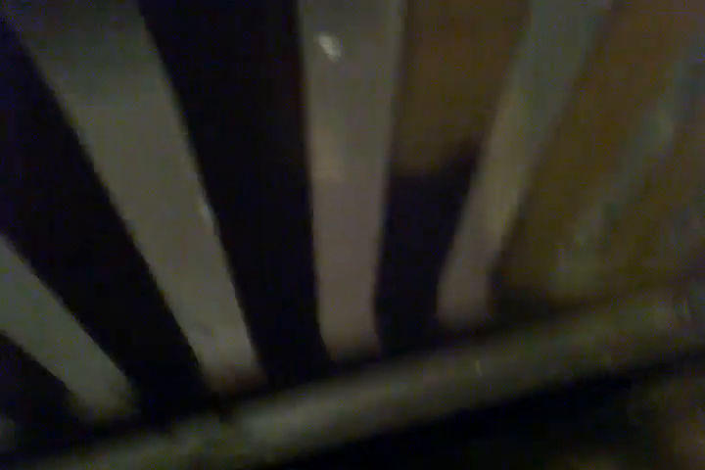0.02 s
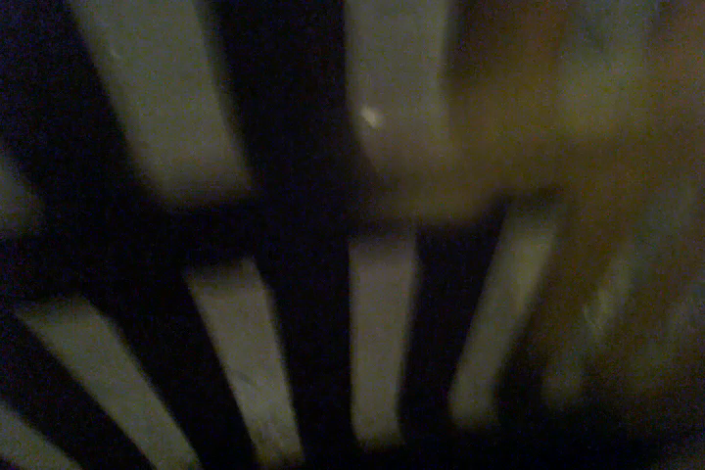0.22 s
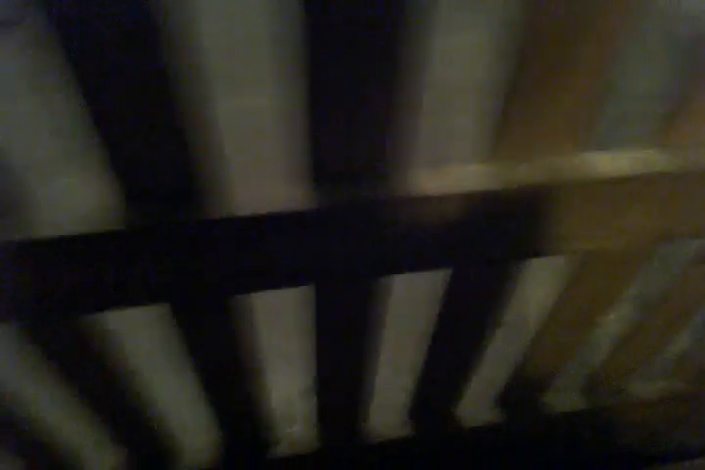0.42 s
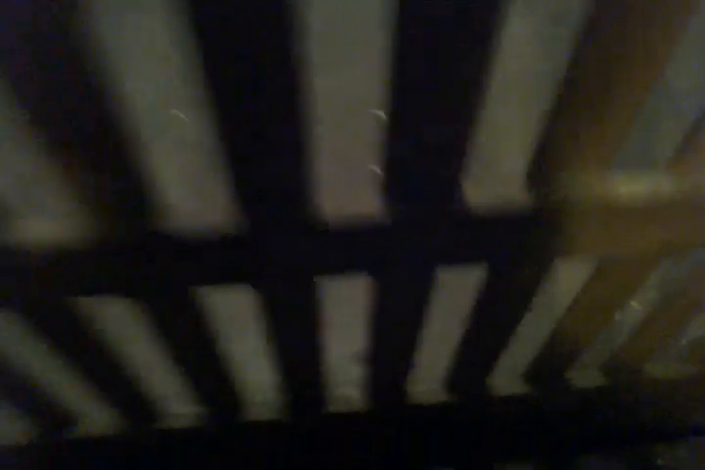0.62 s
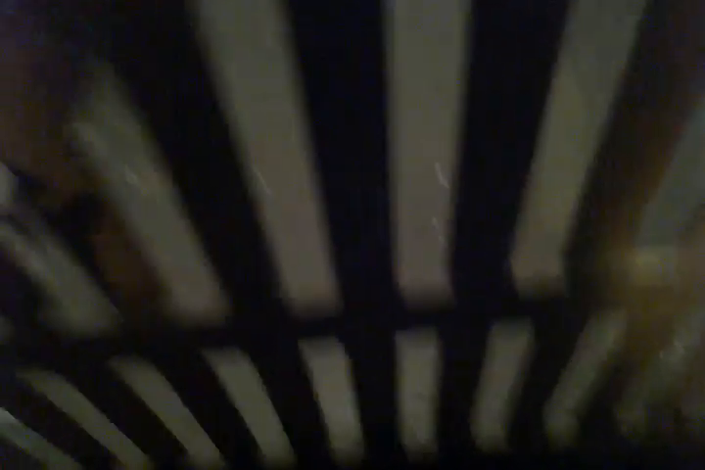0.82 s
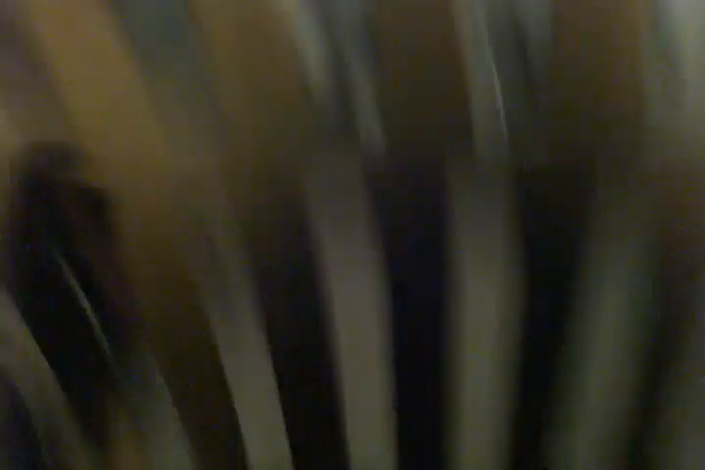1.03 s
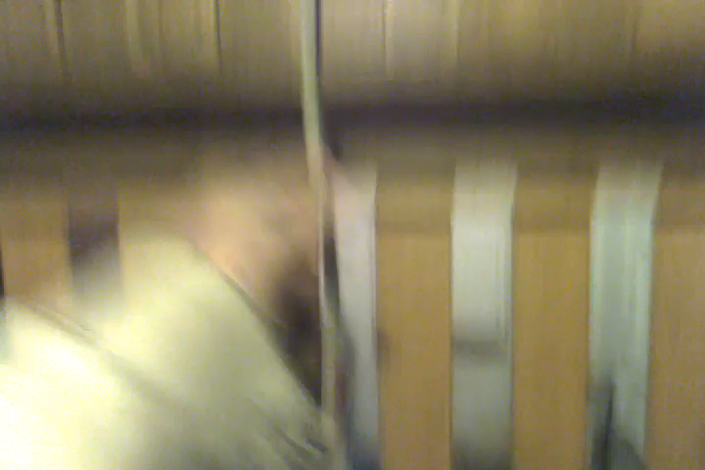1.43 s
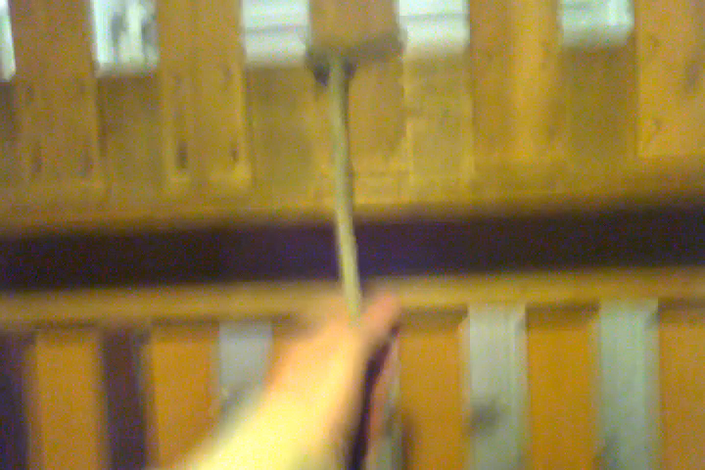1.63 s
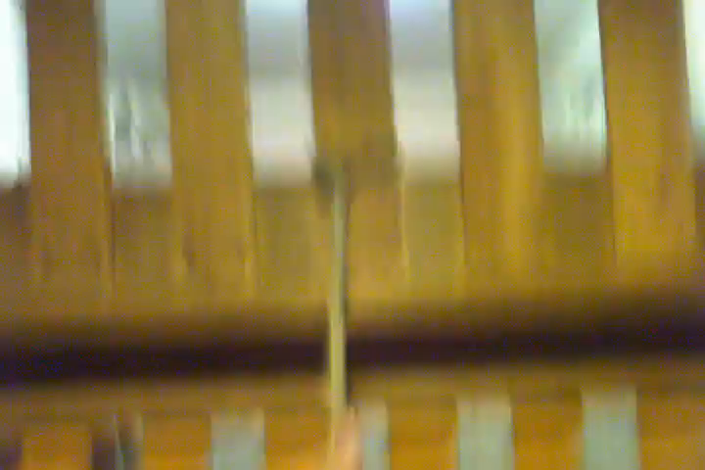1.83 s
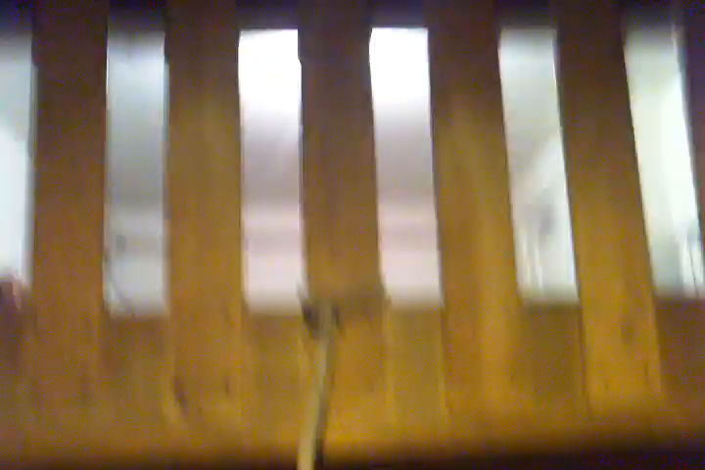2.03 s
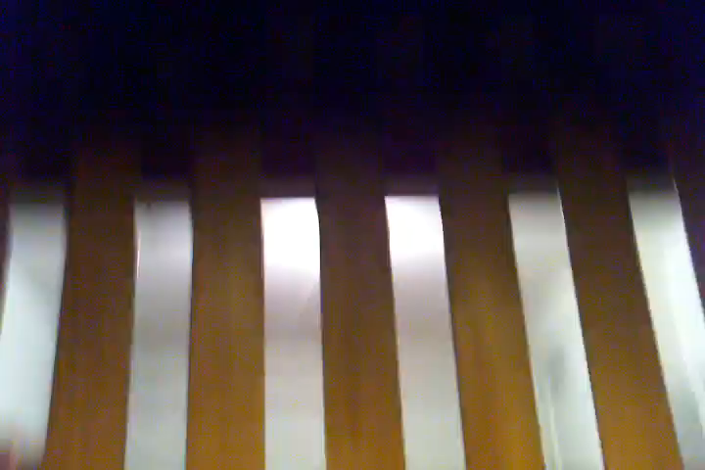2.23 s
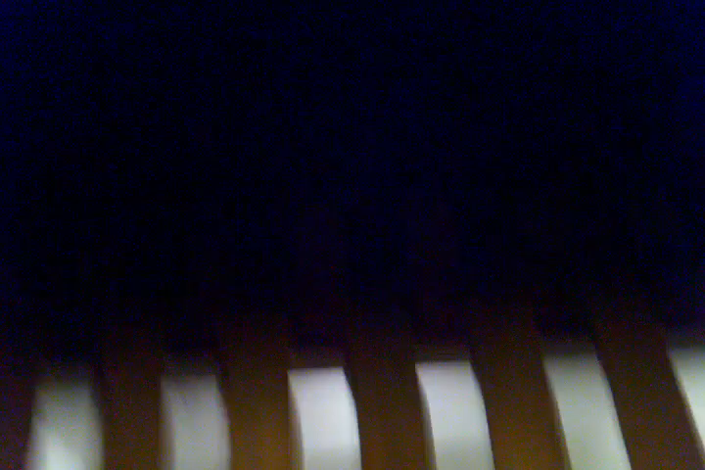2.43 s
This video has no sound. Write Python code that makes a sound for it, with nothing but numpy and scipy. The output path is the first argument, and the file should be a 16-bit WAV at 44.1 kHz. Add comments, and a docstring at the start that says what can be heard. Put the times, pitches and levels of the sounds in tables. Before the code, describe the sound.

Slatted wooden gate clacks loose and rumbles open, fading into faint ticks and microphone bumps.

```python
"""A slatted wooden freight-elevator gate is hauled open. It groans and clacks loose, bangs at 0.3 s, then
rattles ever more softly along its guides while the shaft rings behind it and a sleeve swishes close by.
From 1 s on, fingers bump the hand-held camera, and a few last wooden ticks sound over the building's
drone. Throughout, the two channels are opposite in polarity and a fraction of a millisecond apart."""
import sys
import numpy as np
from scipy import signal
from scipy.fft import rfft, irfft
from scipy.io import wavfile
from scipy.ndimage import uniform_filter1d

SR = 44100
rng = np.random.default_rng(int(sys.argv[2]) if len(sys.argv) > 2 else 0)


def unload_wav(signal):
    """Save mono or channel-first audio to the path in sys.argv[1] as 16-bit WAV at rate SR, clipped to [-1, 1]."""
    wavfile.write(
        sys.argv[1],
        SR,
        np.round(np.clip(np.atleast_2d(signal).T, -1, 1) * 32767).astype(np.int16),
    )


N = 110250
BASS_HZ, TREBLE_HZ = 537, 2810  # shelf edges for the tone of each hit

# tone of the wood (f/Hz, relative level/dB)
WOOD_EQ = [(75, -22), (170, -4.5), (250, -1), (420, -3), (600, -7), (1000, -5), (1400, -4.5), (1750, -15.5),
           (2500, -11.5), (4200, -21), (5600, -29), (10200, -32.5), (12000, -44.5), (14000, -43.5)]
# decay of the slats and of the shaft's tail (f/Hz, t60/s)
SLAT_DECAY = [(150, 0.18), (500, 0.22), (1200, 0.14), (3000, 0.084), (10000, 0.11)]
SHAFT_DECAY = [(150, 1.44), (500, 0.59), (1200, 0.58), (3000, 0.44), (10000, 0.25)]
# ringing modes of the frame (f/Hz, relative level/dB, t60/s)
FRAME_MODES = [(188.2, -5, 0.73), (237.2, 1.5, 0.2), (292.3, 7, 0.31), (349, 1, 0.43), (377, 4, 0.45),
               (416, 2, 0.56), (511.5, 3, 0.29), (652, 0, 0.19), (796.8, 0, 0.39), (903, -3, 0.42),
               (954, -0.5, 0.28), (1074, -3.5, 0.36), (1090, -15, 0.87), (1246, -7, 0.77), (1375, -6, 0.48),
               (1461, 3.5, 0.25)]
# hits of the gate (t/s, level/dB, bass shelf/dB, treble shelf/dB)
GATE_HITS = [(0.001, -37, 6, -11.5), (0.227, -27, -5, 13), (0.233, -20, -11, -20), (0.242, -24.5, -13, 8),
             (0.261, -26, 8, -3), (0.283, -16, -0.5, -4.5), (0.294, -14.5, 0, -15.5),
             (0.309, -26.5, 4.5, -9.5), (0.319, -28, 4, -9.5), (0.443, -28.5, -7, -42),
             (0.461, -30, -9.5, -24.5), (0.56, -38, -10.5, -27.5), (0.747, -38, -11.5, -26),
             (0.86, -45, 0, -7), (0.947, -39.5, -5.5, -29), (1.019, -35, -8, -6.5),
             (1.034, -50.5, 14.5, 12), (1.536, -53, 14.5, 12.5), (1.553, -55, 15.5, 13)]
def gate_knocks(attack_s=0.00057, shaft_build_s=0.0083, shaft_db=-11, frame_db=-11.5):
    """Each blow sets the loose slats clattering, rings the frame and fills the shaft; no two alike."""
    out, t = np.zeros(N), np.arange(SR) / SR
    hz = bins(t)
    octaves_hz = 125 * 2. ** np.arange(8)
    bands = np.array([np.interp(np.log(hz + 1), np.log(octaves_hz), row) for row in np.eye(8)])
    slats = fade(t, curve(octaves_hz, SLAT_DECAY)[:, None]) * (1 - np.exp(-t / attack_s))
    shaft = fade(t, curve(octaves_hz, SHAFT_DECAY)[:, None]) * (1 - np.exp(-t / shaft_build_s))
    envelopes = np.hypot(slats, undb(shaft_db) * shaft)
    rings = np.array([undb(db + frame_db) * fade(t, t60) * np.sin(2 * np.pi * f * t)
                      for f, db, t60 in FRAME_MODES])
    ripple_db = slat_resonances(hz)
    for start, db, bass_db, treble_db in GATE_HITS:
        band_noise = irfft(rfft(rng.standard_normal(SR)) * bands, SR)
        clatter = colour((band_noise * envelopes).sum(axis=0), WOOD_EQ, ripple_db)
        frame = rng.choice([-1, 1], len(rings)) @ rings / 2
        tilt_db = bass_db * below(hz, BASS_HZ) + treble_db * (1 - below(hz, TREBLE_HZ))
        add(out, start, shape(clatter + frame, undb(db + tilt_db)))
    return out


def slat_resonances(hz, depth_db=3.5, spacing_hz=55.44):
    """Dense, uneven peaks and dips in the wood's upper range, in dB."""
    steps = rng.standard_normal(len(hz))
    ripple = np.interp(hz / spacing_hz, np.arange(len(hz)), steps)
    return depth_db * ripple * (1 - below(hz, 1420))


# sharp wooden transients (t/s, peak level/dB, treble shelf/dB)
EDGE_HITS = [(0.2279, -12, 17.5), (0.297, -8.5, 11), (1.490, -40.5, -2), (1.539, -48, -14),
             (2.2244, -41, -19.5), (2.429, -39, -4)]
def wood_ticks(decay_s=0.0077, splinter_db=-6.5):
    """Hard edges meet: one sharp impulse and a splintery trail of a few milliseconds."""
    out, t = np.zeros(N), np.arange(SR // 10) / SR
    for start, db, treble_db in EDGE_HITS:
        trail = rng.standard_normal(len(t)) * np.exp(-t / decay_s)
        crack = (t == 0) + undb(splinter_db) * trail / np.linalg.norm(trail)
        crack = colour(crack, WOOD_EQ, treble_db * (1 - below(bins(t), TREBLE_HZ)))
        add(out, start, undb(db) * crack / np.abs(crack).max())
    return out


# tone of the guides (f/Hz, relative level/dB)
GUIDE_EQ = [(60, -7), (100, 8), (330, 0.5), (600, 0), (1300, -10), (1900, -27), (3000, -30.5), (6000, -43)]
# fader curve of the rumble (t/s, level/dB)
RUMBLE_FADER = [(0, -36), (.19, -43), (.34, -34), (.52, -45), (.68, -53), (.9, -52.5), (1.1, -58.5),
                (1.3, -64.5), (1.65, -70), (1.9, -79)]
def guide_rumble(t, rattles_per_s=180, decay_s=0.015, rattle_share=0.45):
    """The gate rumbles in its guides, with small random rattles."""
    contacts = 1. * (rng.random(N) < rattles_per_s / SR)
    energy = signal.lfilter([1], [1, -np.exp(-2 / (decay_s * SR))], contacts)
    grain = np.sqrt(1 - rattle_share + rattle_share * energy / energy.mean())
    level_db = np.interp(t, *np.array(RUMBLE_FADER).T)
    return colour(grain * rng.standard_normal(N), GUIDE_EQ) * undb(level_db)


# tonal swells of the rubbing gate (centre t/s, half width/s, f/Hz, level/dB)
GROAN_CUES = [(0.12, 0.13, 377, -42.5), (0.149, 0.022, 1205, -42.5), (0.59, 0.032, 324.4, -39.5),
              (1.06, 0.077, 254.5, -48), (1.59, 0.049, 310, -50.5)]
def friction_groans(t, wobble_hz=9.3):
    """Friction keeps one resonance of the gate ringing for a moment, unsteady in pitch."""
    out = np.zeros(N)
    for centre, width, hz, db in GROAN_CUES:
        phase = 2 * np.pi * np.cumsum(hz + wobble_hz * drift(per_s=90)) / SR
        swell = np.exp(-((t - centre) / width) ** 2 / 2)
        out += undb(db) * swell * np.sin(phase)
    return out


# close, dull thuds (t/s, relative level/dB, f/Hz, overtone/dB)
FINGER_HITS = [(1.036, -26.5, 90.7, 1.5), (1.179, -32.5, 139, -9), (1.218, -30.5, 121, -2),
               (1.332, -31.5, 145, -1), (1.465, -20.5, 139, -14.5), (1.498, -23, 120, -18),
               (1.597, -22, 139, -22), (1.659, -30, 155, -11), (1.816, -28.5, 169, -11),
               (1.847, -27.5, 130, -9), (1.945, -21.5, 145, -12.5), (2.083, -29.5, 142, -16.5),
               (2.237, -31, 183, -6), (2.482, -27.5, 137, -11)]
def finger_bumps(rise_s=0.013, decay_s=0.0044, sag=0.25, sag_s=0.0021, overtone_ratio=2.2):
    """A soft push on the camera body: two or three low cycles that sag in pitch, a shorter overtone."""
    out, t = np.zeros(N), np.arange(SR // 10) / SR
    push = (1 - np.exp(-t / rise_s)) * np.exp(-t / decay_s)
    push /= push.max()
    for start, db, hz, overtone_db in FINGER_HITS:
        phase = 2 * np.pi * hz * (t + sag * sag_s * (1 - np.exp(-t / sag_s)))
        thud = push * np.sin(phase)
        overtone = undb(overtone_db) * push ** 2 * np.sin(overtone_ratio * phase)
        add(out, start, undb(db) * (thud + overtone) / 2)
    return out


# tone of the cloth (f/Hz, relative level/dB)
CLOTH_EQ = [(80, -15), (400, 16), (1300, 7.5), (2200, 11.5), (4300, 6.5), (5600, 3), (7500, 4),
            (10500, 1.5), (12000, 3.5), (14000, -14)]
# cloth passes (centre t/s, half width/s, level/dB, body boost/dB)
SLEEVE_CUES = [(0.151, 0.078, -55.5, 19.5), (0.408, 0.024, -53.5, 16), (0.654, 0.075, -54.5, -12),
               (0.854, 0.023, -57.5, 11), (1.284, 0.025, -57.5, 19), (1.555, 0.041, -62.5, -14),
               (2.408, 0.028, -51.5, 5.5)]
def sleeve_swishes(t, roughness_db=2, body_hz=1100):
    """Cloth brushes past in short grainy swells, with a hollow body where it rubs on wood."""
    out = np.zeros(N)
    fibres = colour(rng.standard_normal(N) * undb(roughness_db * drift(per_s=400)), CLOTH_EQ)
    body = irfft(rfft(fibres) * bell(bins(t), body_hz, octaves=0.21), N)
    for centre, width, db, body_db in SLEEVE_CUES:
        swell = 1 / (1 + ((t - centre) / width) ** 2 / 2) ** 2
        out += undb(db) * swell * (fibres + (undb(body_db) - 1) * body)
    return out


# tone of the room's air (f/Hz, relative level/dB)
ROOM_EQ = [(25, -15), (55, 8.5), (110, 9.5), (280, 1.5), (550, -7), (1050, -13), (2000, -16), (4200, -21),
           (5600, -26.5), (8000, -20), (14000, -21)]
# narrow resonances of the building's drone (f/Hz, level/dB)
DRONE_PEAKS = [(255, -66), (1030, -78)]
def room_tone(level_db=-56, waver_db=3.5, waver_below_hz=496, peak_half_width_hz=7):
    """The building's bed: wavering low noise and a faint drone under a thin steady hiss."""
    out = colour(rng.standard_normal(N), ROOM_EQ, level_db)
    lows = irfft(rfft(out) * below(bins(out), waver_below_hz), N)
    out += lows * (undb(waver_db * drift(per_s=20)) - 1)
    for hz, db in DRONE_PEAKS:
        peak = 1 / (1 + ((bins(out) - hz) / peak_half_width_hz) ** 2)
        drone = irfft(rfft(rng.standard_normal(N)) * peak, N)
        out += undb(db) * drone / drone.std()
    return out


# stereo width: diffuse sound relative to what the channels share (f/Hz, level/dB)
WIDTH_EQ = [(120, -15.5), (650, -11), (1400, -28), (3000, -25), (6000, -7)]
def stereo_pair(direct, scattered, width_db=0, lag_s=0.0003423):
    """The right channel is inverted and late; sound from other directions differs between the two."""
    hz = np.arange(N + 1) * SR / (2 * N)
    ratio = undb(curve(hz, WIDTH_EQ) + width_db)
    shared, diffuse = np.array([rfft(direct, 2 * N), ratio * rfft(scattered, 2 * N)]) / np.hypot(1, ratio)
    late = (shared - diffuse) * np.exp(-2j * np.pi * hz * lag_s)
    return irfft(np.array([shared + diffuse, -late]))[:, :N]


# pan of the gate (f/Hz, left minus right level/dB)
GATE_PAN = [(60, -7), (130, 4.5), (380, 8), (650, 4.5), (1200, 0), (2500, 0)]
def pan_gate(pair, bend_rad=0.57, bend_hz=390):
    """The gate's low mids lean left, and a phase bend makes them less opposed between the channels."""
    left, right = np.pad(pair, ((0, 0), (0, N)))
    hz = bins(left)
    bend = bend_rad * bell(hz, bend_hz, octaves=0.88)
    lean = undb(curve(hz, GATE_PAN) / 2) * np.exp(.5j * bend)  # half to each side
    return np.array([irfft(rfft(left) * lean), irfft(rfft(right) / lean)])[:, :N]


def undb(db):
    """Decibels to gain."""
    return 10 ** (np.asarray(db) / 20)


def curve(hz, points):
    """Read (f/Hz, value) points on a log-frequency axis."""
    f, values = np.array(points, float).T
    return np.interp(np.log(np.maximum(hz, 1)), np.log(f), values)


def bins(x):
    """Frequencies of the spectrum of x."""
    return np.arange(len(x) // 2 + 1) * SR / len(x)


def shape(x, gain):
    """Minimum-phase EQ with the given gain at each frequency."""
    cepstrum = irfft(np.log(gain + 1e-9), len(x))
    cepstrum[1:len(x) // 2] *= 2
    cepstrum[len(x) // 2 + 1:] = 0
    return irfft(rfft(x) * np.exp(rfft(cepstrum)), len(x))


def colour(x, eq, extra_db=0):
    """EQ white sound at equal power, then apply an extra gain or tilt."""
    gain = undb(curve(bins(x), eq))
    return shape(x, gain / np.sqrt(np.mean(gain ** 2)) * undb(extra_db))


def below(hz, edge_hz):
    """Smooth shelf: 1 under the edge, 0 above it."""
    return 1 / (1 + np.square(hz / edge_hz) ** 2)


def bell(hz, centre_hz, octaves):
    """Bell on a log-frequency axis, 1 at the centre."""
    return np.exp(-(np.log2((hz + 1) / centre_hz) / octaves) ** 2 / 2)


def drift(per_s):
    """Smooth random modulation of unit spread, about per_s steps a second."""
    span = SR // per_s
    smooth = uniform_filter1d(uniform_filter1d(rng.standard_normal(N), span), span)
    return smooth / smooth.std()


def add(out, start_s, x):
    """Mix x in at a time."""
    i = int(np.clip(start_s * SR, 0, N - 1))
    out[i:i + len(x)] += x[:N - i]


def fade(t, t60):
    """Exponential decay, 60 dB in t60."""
    return np.exp(-np.log(1000) * t / t60)


def scene():
    """The mix: the gate leaning left, handling sounds and room tone in the centre."""
    t = np.arange(N) / SR
    gate = gate_knocks() + wood_ticks() + guide_rumble(t) + friction_groans(t)
    gate = pan_gate(stereo_pair(gate, scattered=gate_knocks() + guide_rumble(t)))
    handling = stereo_pair(finger_bumps() + sleeve_swishes(t), scattered=sleeve_swishes(t))
    room = stereo_pair(room_tone(), scattered=room_tone(), width_db=3.5)
    return gate + handling + room


def record(dry, low_cut_hz=82.6, high_cut_hz=14000):
    """The camera cuts the deep bass and, steeply, the top."""
    thin = signal.sosfilt(signal.butter(3, low_cut_hz, "high", fs=SR, output="sos"), dry)
    return signal.sosfilt(signal.ellip(10, .2, 80, high_cut_hz, fs=SR, output="sos"), thin)


dry = scene()
out = record(dry)
unload_wav(out)
```